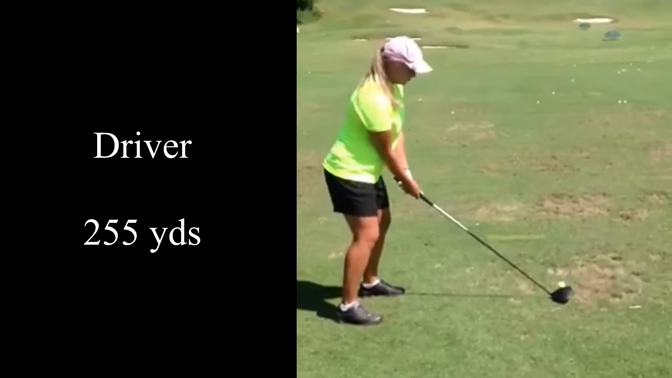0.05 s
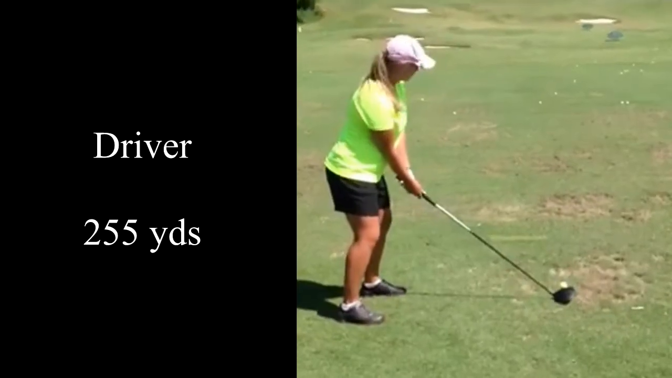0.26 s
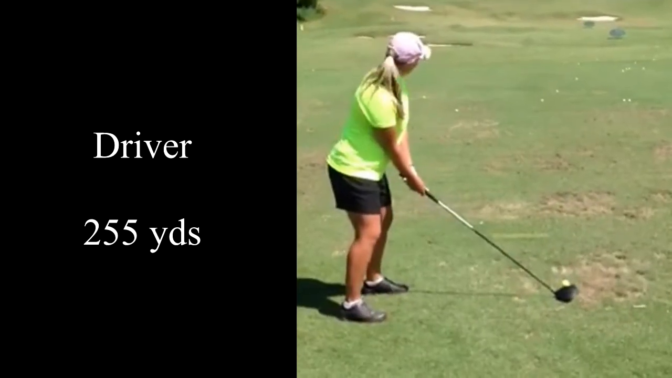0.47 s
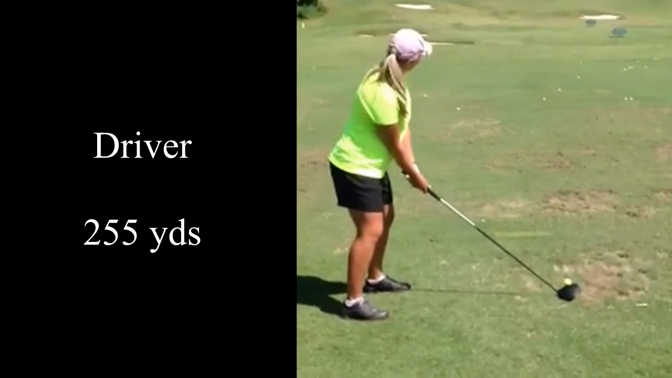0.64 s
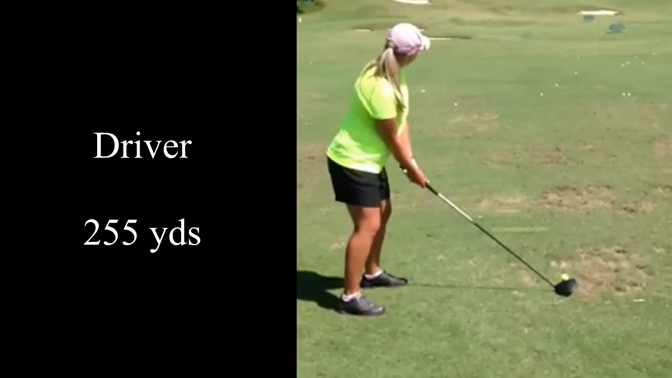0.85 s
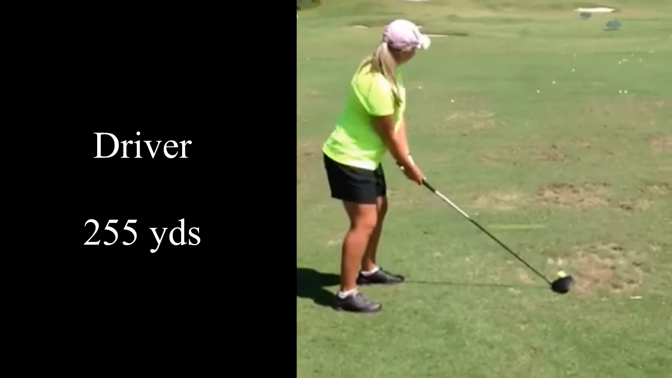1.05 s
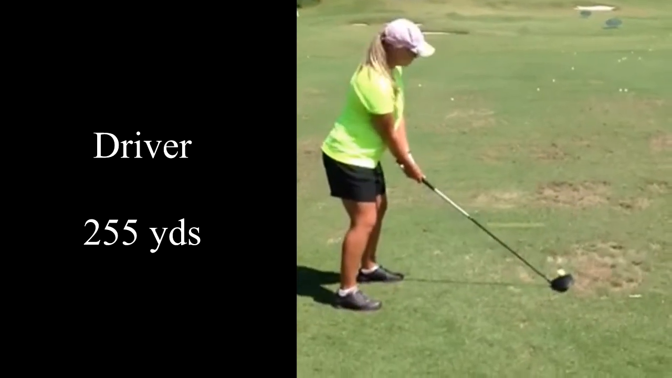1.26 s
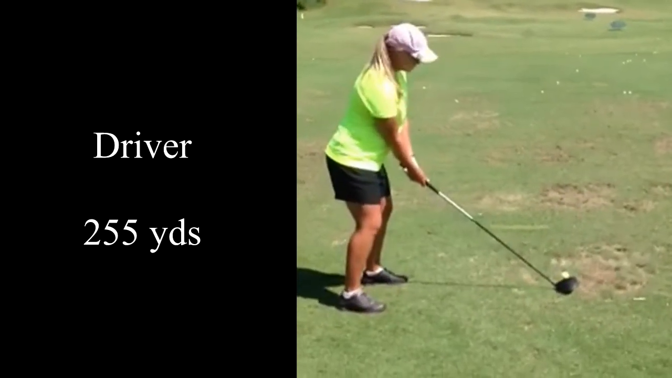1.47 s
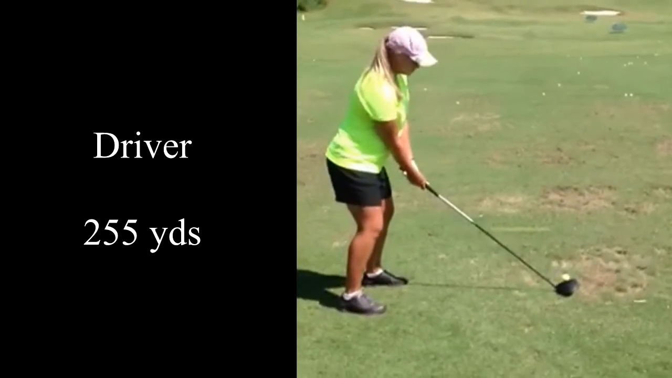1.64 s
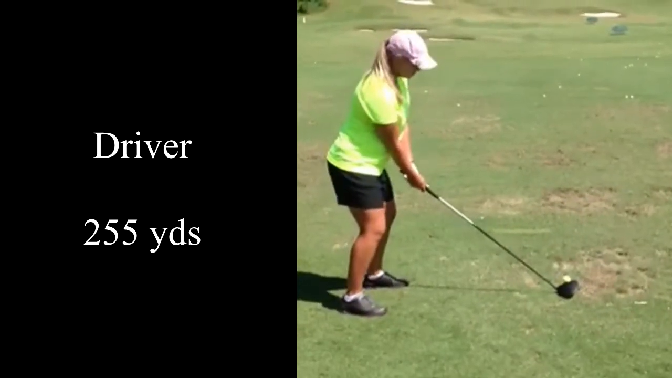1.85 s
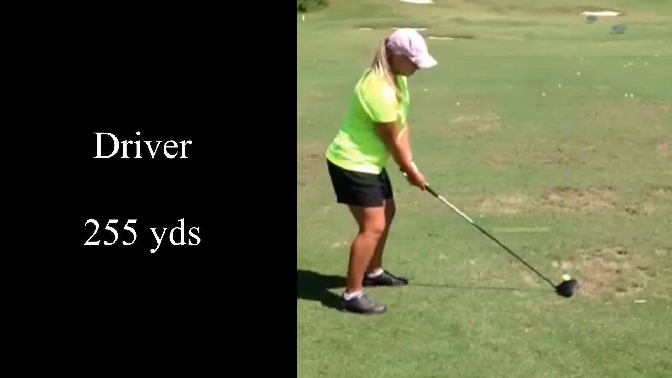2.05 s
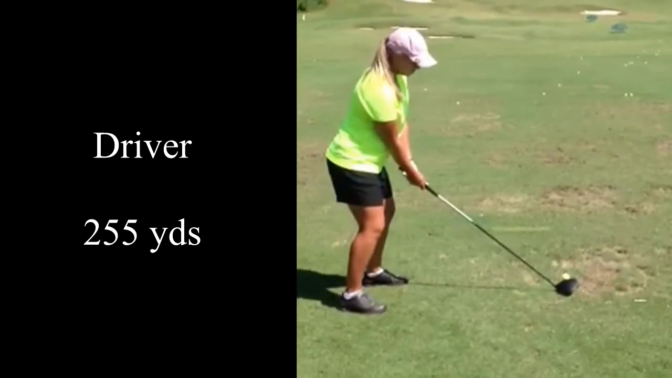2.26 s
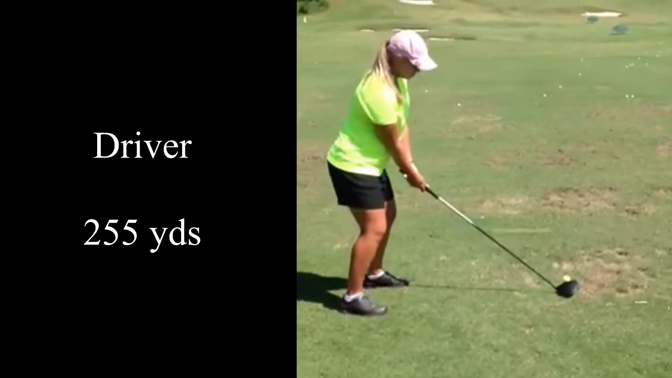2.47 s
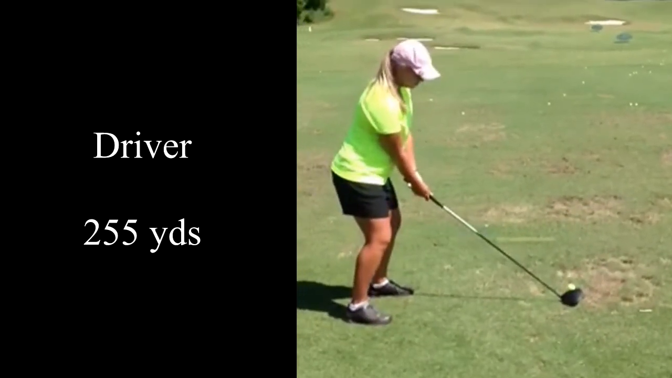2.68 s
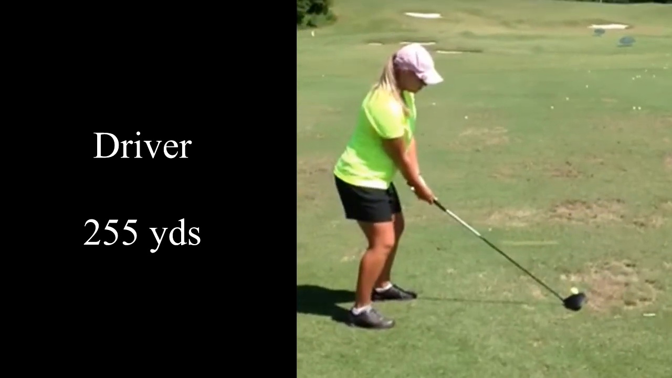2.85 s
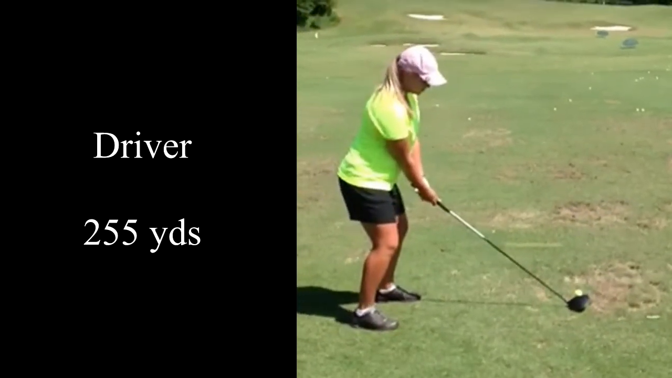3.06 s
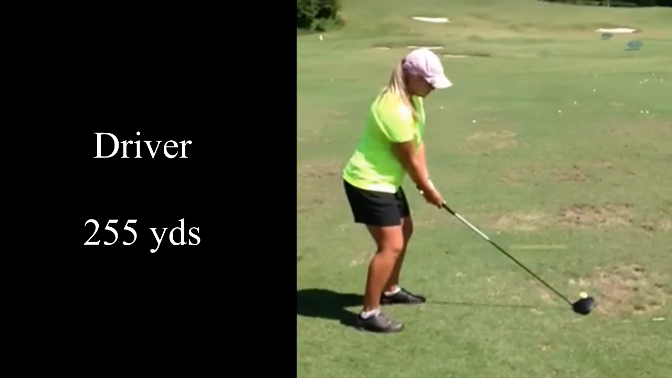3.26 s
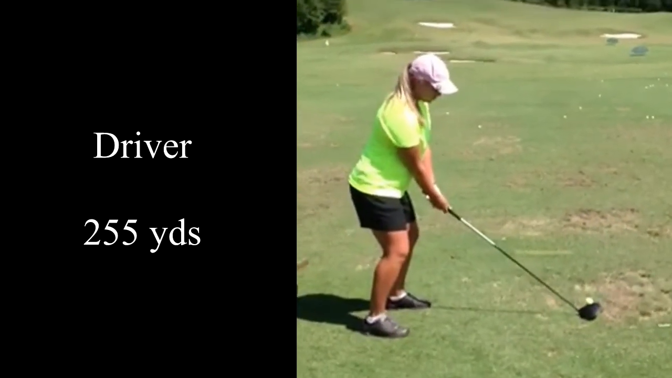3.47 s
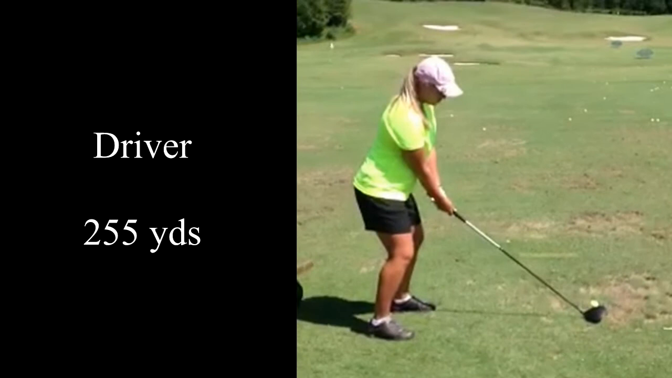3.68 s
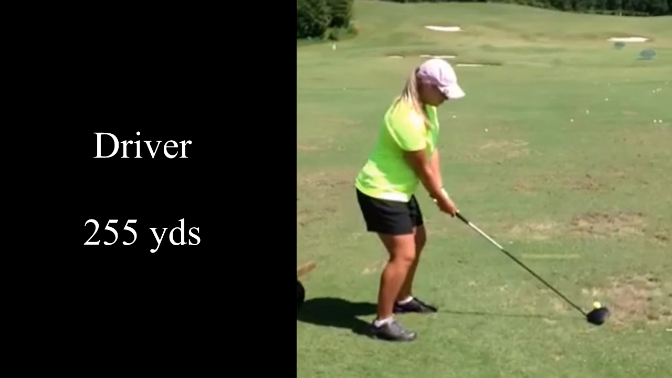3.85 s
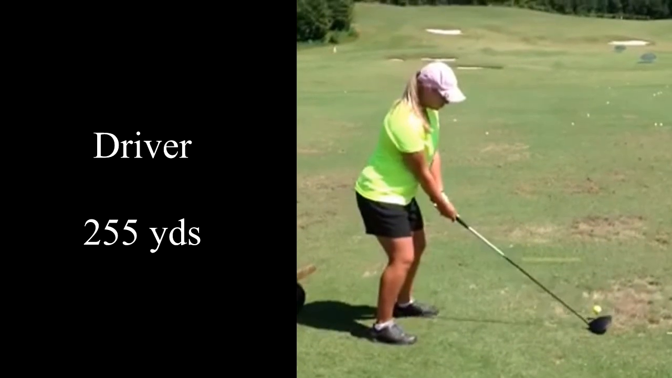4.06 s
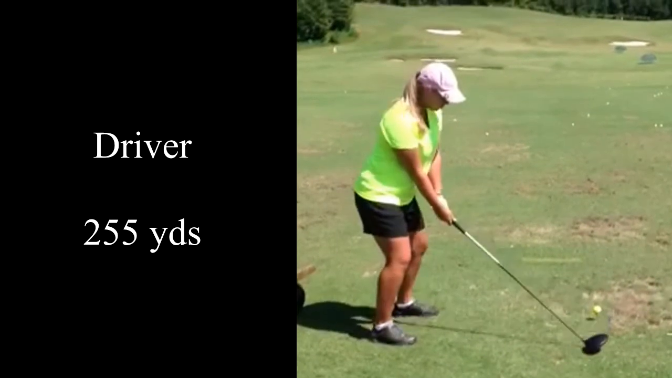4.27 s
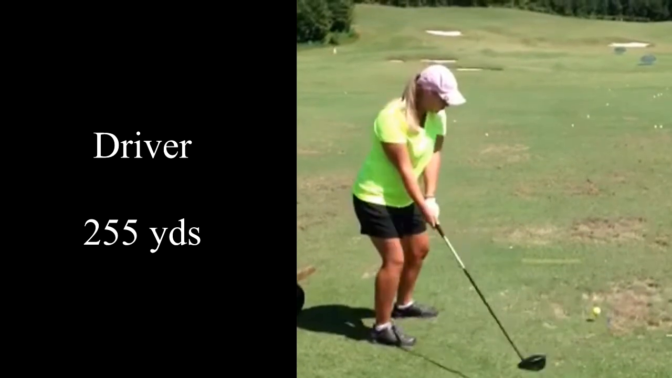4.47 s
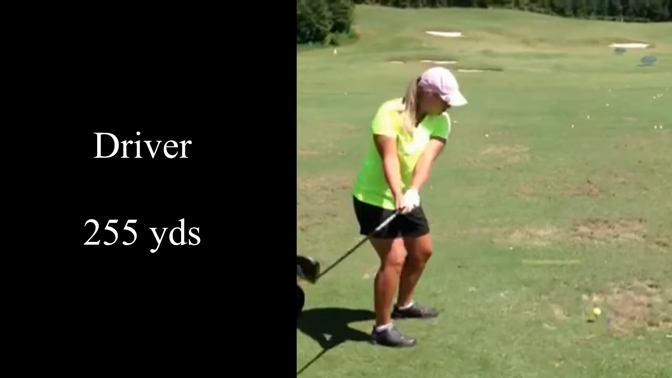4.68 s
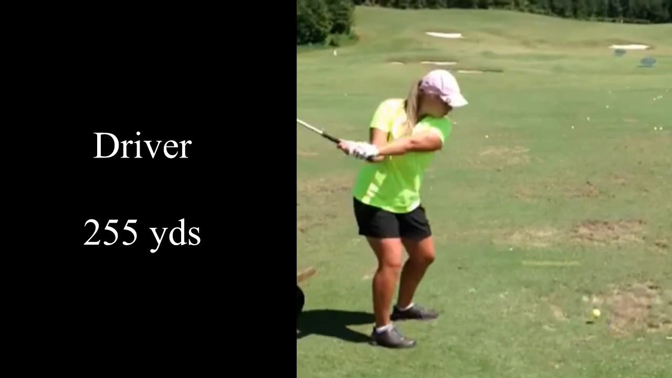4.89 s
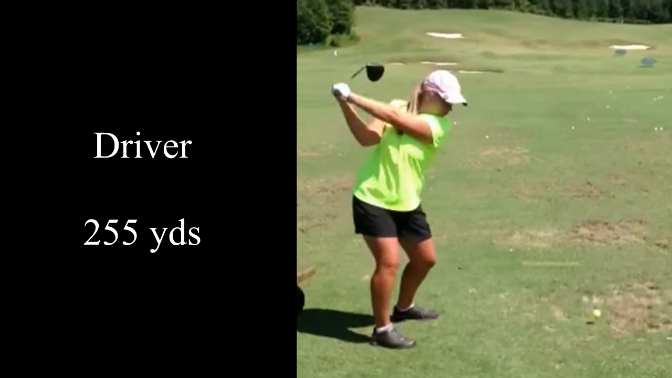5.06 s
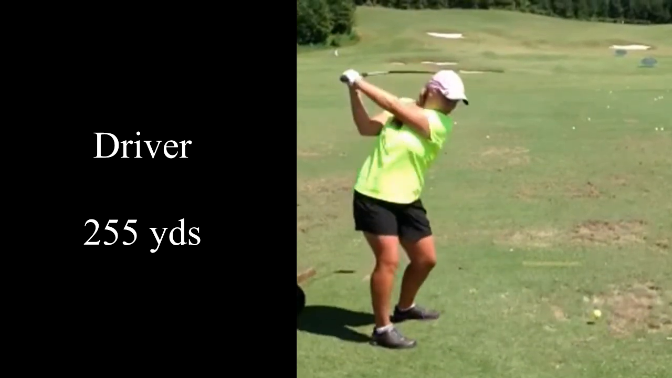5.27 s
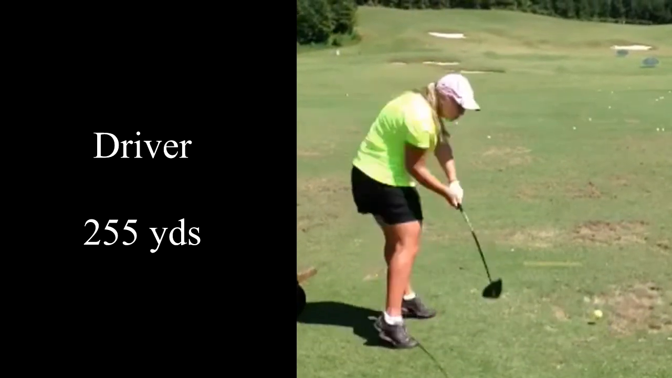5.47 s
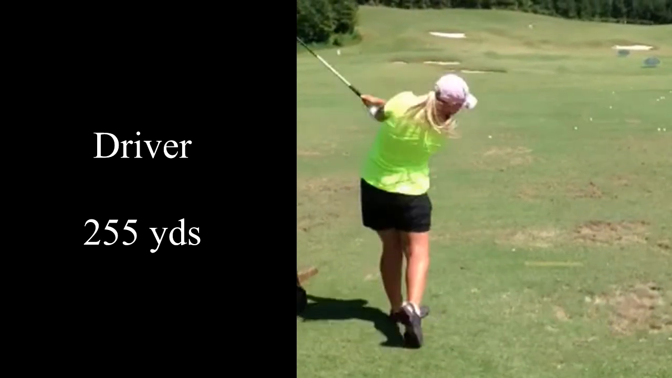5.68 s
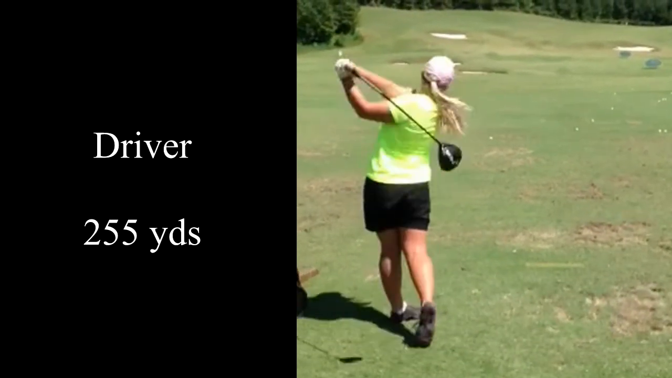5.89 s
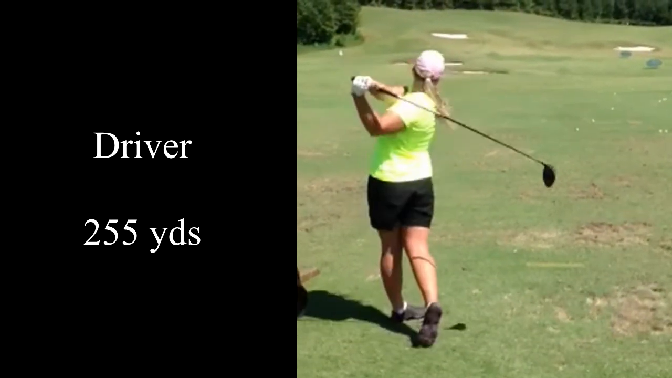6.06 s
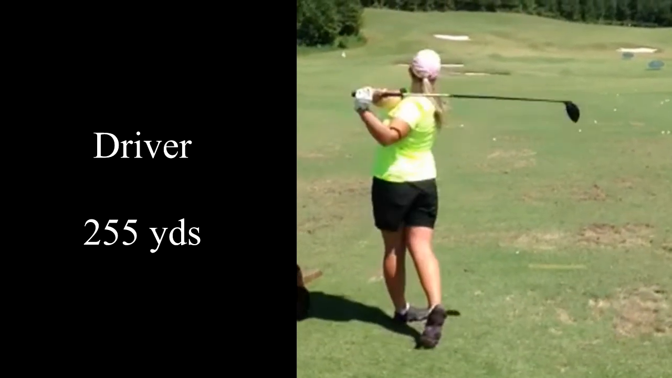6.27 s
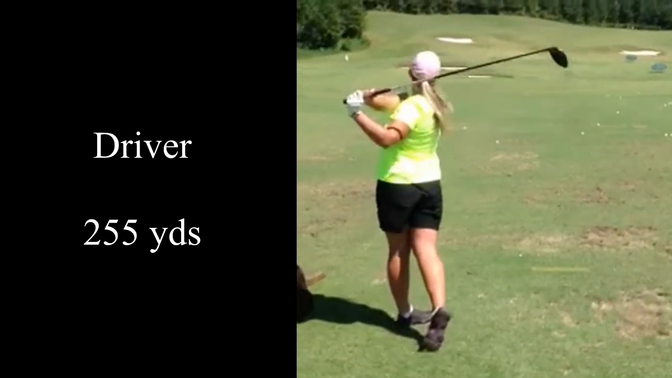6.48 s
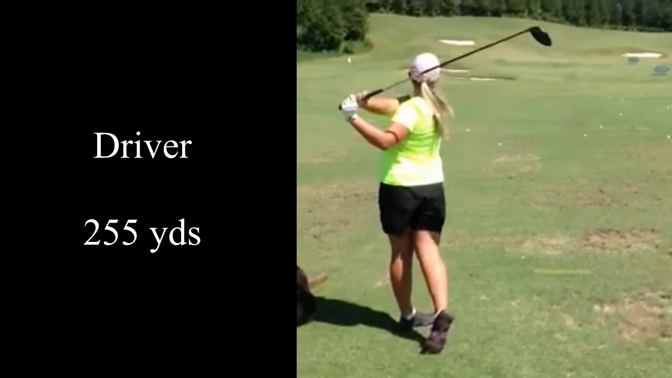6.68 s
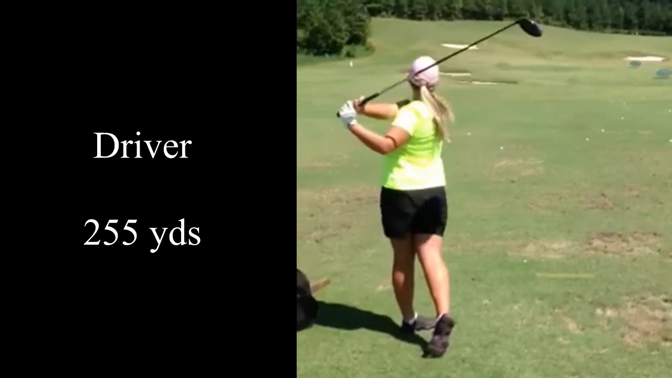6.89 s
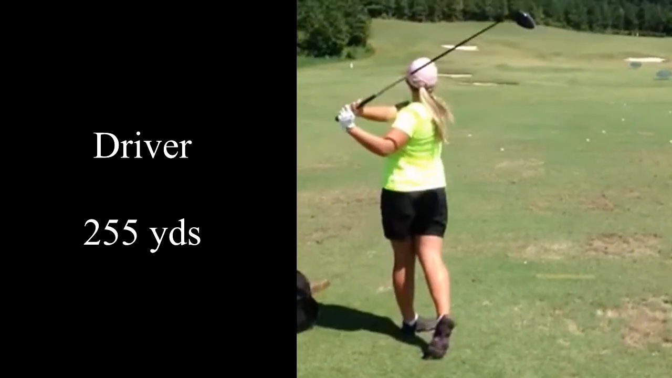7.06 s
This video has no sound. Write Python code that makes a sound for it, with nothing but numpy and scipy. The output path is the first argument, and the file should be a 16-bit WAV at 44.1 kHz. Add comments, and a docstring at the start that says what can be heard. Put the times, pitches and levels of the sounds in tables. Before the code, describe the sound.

On a grass practice tee, two insects trade thin, high buzzes that end in ticks, over a low rumble of air and a faint hiss. A few soft knocks sound nearby, a distant club clinks and a far bird whistles. Late on, close to the microphone, a golf driver swishes down and hits the ball with one loud metallic crack and a brief ring. The insects carry on more quietly.

```python
"""A grass practice tee on a summer day, where a golfer drives a ball.
The shaft sheds vortices as it swishes down; the hollow metal head cracks against the ball and rings
in its natural modes, and a limiter ducks and slowly recovers. Two meadow katydids buzz and tick by
rubbing their wings, over a low rumble of air and the hiss of far insects. A far bird whistles,
a distant club clinks and a few soft knocks sound close by."""
import sys
import numpy as np
from scipy import signal
from scipy.fft import rfft, irfft
from scipy.io import wavfile
from scipy.ndimage import uniform_filter1d, minimum_filter1d

SR = 44100
rng = np.random.default_rng(int(sys.argv[2]) if len(sys.argv) > 2 else 0)


def pcm_store(signal):
    """Save signal as 16-bit PCM."""
    levels = np.round(np.clip(np.atleast_2d(signal), -1, 1) * 32767)
    wavfile.write(sys.argv[1], SR, levels.astype(np.int16).T)


N = 314433
TIME = np.arange(N) / SR
IMPACT_S = 5.6132

# Spectrum of the open air: frequency_hz, relative_density_db
AIR_SPECTRUM = [(18, -67), (30, -39.5), (81, -16), (112, -3.5), (172, 0), (315, -6), (374, -5), (408, -7.5),
                (1150, -13), (1340, -15.5), (2190, -17.5), (2390, -14.5), (3600, -15.5), (4280, -18),
                (5200, -20), (6760, -46.5), (11400, -120)]
# Spectrum of the far insects: frequency_hz, relative_density_db
INSECT_SPECTRUM = [(4000, -20), (4800, -11), (6200, -1.5), (8000, 0), (10300, -1), (12200, 1), (15000, -10)]
# Bird whistles: start_s, length_s, first_pitch_hz, last_pitch_hz, level_db
BIRD_NOTES = [(2.18, .09, 2490, 2370, -57), (2.57, .06, 2880, 2850, -59), (2.80, .037, 2860, 2820, -56),
              (2.835, .05, 2520, 2320, -57), (2.88, .08, 2340, 2350, -62), (4.525, .04, 2550, 2630, -58),
              (4.615, .04, 2200, 2020, -57), (4.69, .065, 2600, 2330, -56), (4.825, .07, 2680, 3060, -55),
              (4.93, .11, 2120, 2600, -61), (5.275, .05, 5100, 5350, -57), (5.687, .086, 2020, 2110, -55.5)]
# Soft knocks: start_s, gain_db, first_pitch_hz, last_pitch_hz, glide_s
SOFT_KNOCKS = [(.594, -41, 1200, 200, .0035), (.855, -36, 1900, 130, .0035), (.927, -39.5, 800, 130, .004),
               (1.032, -23, 1610, 160, .0015), (1.803, -33, 400, 139, .003), (1.834, -37, 2200, 300, .005),
               (1.843, -34, 300, 170, .003), (5.799, -31.5, 300, 250, .005)]
# Modes of a distant club: pitch_hz, relative_level_db, t60_s
FAR_CLUB_MODES = [(1185, -4, 0.13), (4770, -1, .13), (5500, 2, .07)]
# Wing rasp in a buzz: frequency_hz, relative_density_db
BUZZ_SPECTRUM = [(3000, -30), (5200, -7.5), (6300, -5), (8500, 4), (10300, -5), (12200, -1), (15000, -8.5)]
# Wing rasp in a tick: frequency_hz, relative_density_db
TICK_SPECTRUM = [(4500, -19), (7000, -12), (8300, -3), (9300, 4.5), (10300, -5.5), (12200, 2), (15000, -4)]
# Wings of each katydid, by singer: resonance_hz, lower_resonance_gain_db
KATYDID_WINGS = {"bright": (8400, -20), "dark": (7850, -9.5)}
# Phrases, each a buzz closed by a tick: singer, tick_start_s, tick_gain_db, buzz_gain_db
KATYDID_PHRASES = [("bright", .0368, -36.5, -55), ("bright", .6559, -34.5, -53),
                   ("bright", 1.2506, -35.5, -53), ("bright", 1.8302, -33, -52),
                   ("bright", 2.4458, -33.5, -52), ("bright", 3.055, -34.5, -53),
                   ("bright", 3.6745, -35.5, -54), ("bright", 4.2714, -35, -55),
                   ("bright", 4.877, -33, -55), ("bright", 5.491, -33.5, -54),
                   ("bright", 6.0496, -37.5, -56), ("bright", 6.635, -35.5, -50),
                   ("bright", 7.25, -34, -53), ("dark", .342, -37, -58), ("dark", 1.068, -37, -56),
                   ("dark", 1.7744, -41, -57), ("dark", 2.393, -39, -56.5), ("dark", 3.018, -40, -54),
                   ("dark", 3.6112, -38, -54), ("dark", 4.2714, -37, -51), ("dark", 4.9237, -38, -51.5),
                   ("dark", 5.55, -38, -52), ("dark", 6.1664, -34, -53), ("dark", 6.7211, -35, -51),
                   ("dark", 7.3, -36, -51)]
# Turbulence behind the club head: frequency_hz, relative_density_db
WAKE_SPECTRUM = [(50, -27.5), (120, -10.5), (220, 0.5), (450, -6), (800, -1), (1250, -3.5), (1800, -11.5),
                 (3000, -19.5), (6000, -24), (13000, -32)]
# The crack scattered by turf and nearby things: frequency_hz, relative_density_db
SCATTER_SPECTRUM = [(60, -12.5), (250, -7), (600, -4), (1200, -3), (2000, -10), (2900, -16.5), (3600, -5.5),
                    (4000, -2), (4750, -18), (5500, 0), (7000, -1.5), (9000, -6), (15000, -3.5)]
# Decay of the scattered sound: frequency_hz, t60_s
SCATTER_DECAY = [(100, .1), (700, .085), (1300, .1), (2800, .09), (4000, .17), (4800, 0.092), (5600, .14),
                 (7500, .09), (15000, .09)]
# Modes of the driver head and ball: pitch_hz, relative_level_db, t60_s
HEAD_MODES = [(560, -6.5, .022), (740, -8, .02), (884, -16, 0.022), (1320, -3, 0.019), (1950, -7, 0.018),
              (2452, -8, .02), (2980, -14.5, 0.032), (3585, -8.5, .04), (3656, -16, .13), (3800, -27, 0.15),
              (5360, -9, .06), (5715, -26.5, .11), (5790, -22, .11), (6280, -16.5, 0.076), (6590, -7, .045),
              (6830, -10, .045), (7030, -11.5, .05), (7592, -3.5, .038), (8300, -19, .035),
              (8700, -15, 0.04), (9330, -15, .035), (9672, -10.5, 0.039), (10240, -12.5, .04),
              (10470, -12, .03), (11200, -13.5, .03), (12020, -18.5, .03), (12430, -13.5, .03)]


def from_db(db):
    """Amplitude grows tenfold every 20 dB."""
    return 10 ** (np.asarray(db) / 20)


def unit_rms(x):
    """Normalisation to unit mean power."""
    return x / np.sqrt(np.mean(x ** 2) + 1e-20)


def at_hz(curve, hz):
    """Interpolation on a logarithmic frequency axis."""
    points_hz, values = np.transpose(curve)
    return np.interp(np.log(np.maximum(hz, 1)), np.log(points_hz), values)


def add(out, start_s, sound):
    """Superposition: a sound adds to the mix from its start time."""
    at = round(start_s * SR)
    lo, hi = max(at, 0), min(at + len(sound), N)
    if lo < hi:
        out[lo:hi] += sound[lo - at:hi - at]


def wander(size, step_s):
    """Slow random modulation: a new value each step, joined by straight lines."""
    return np.interp(TIME[:size] / step_s, np.arange(64), rng.standard_normal(64))


def shaped_noise(spectrum):
    """Spectral shaping colours white noise and rolls off beyond the table's ends; rms 1."""
    hz = np.arange(N // 2 + 1) * SR / N
    low_skirt = np.minimum(hz / spectrum[0][0], 1) ** 2
    high_skirt = np.minimum(spectrum[-1][0] / (hz + 1), 1) ** 4
    gain = from_db(at_hz(spectrum, hz)) * low_skirt * high_skirt
    return unit_rms(irfft(rfft(rng.standard_normal(N)) * gain, N))


def resonant_noise(hz, width_hz, size):
    """A randomly driven resonance gives narrowband noise, whose centre may move; rms 1."""
    lowpass = signal.butter(2, width_hz / 2, fs=SR, output="sos")
    sway = signal.sosfilt(lowpass, rng.standard_normal((2, size)))
    phase = 2 * np.pi * np.cumsum(hz * np.ones(size)) / SR
    return unit_rms(sway[0] * np.cos(phase) + sway[1] * np.sin(phase))


def struck(modes):
    """Free vibration is a sum of damped modes; neighbours start in opposite directions."""
    t = TIME[:SR // 2]
    return sum((-1) ** k * from_db(db - 60 * t / t60_s) * np.sin(2 * np.pi * hz * t)
               for k, (hz, db, t60_s) in enumerate(modes))


def open_air(level_db=-53.1, wander_db=.3):
    """Broadband ambient noise, strongest in the bass, drifts slightly in level."""
    return from_db(level_db + wander_db * wander(N, step_s=.4)) * shaped_noise(AIR_SPECTRUM)


def far_insects(hiss_db=-49.8, fade_db_per_s=.38, lull_s=2.8, lull_width_s=1.4, lull_depth_db=17):
    """Incoherent calls merge into noise: a fading hiss, a trill with one lull and a thin whine."""
    hiss = from_db(hiss_db - fade_db_per_s * TIME) * shaped_noise(INSECT_SPECTRUM)
    lull_db = lull_depth_db * np.exp(-((TIME - lull_s) / lull_width_s) ** 2)
    trill = resonant_noise(hz=3500, width_hz=1000, size=N)
    trill_core = from_db(-8) * resonant_noise(hz=3600, width_hz=160, size=N)
    whine = from_db(-61) * resonant_noise(hz=7900, width_hz=220, size=N)
    return hiss + from_db(-58.5 - lull_db) * (trill + trill_core) + whine


def bird(blur=.4, blur_hz=140, echo_db=-6.5, echo_t60_s=.45):
    """Scattering among trees blurs short gliding whistles and gives them reverberation."""
    out, t = np.zeros(N), TIME[:SR // 2]
    for start_s, length_s, first_hz, last_hz, level_db in BIRD_NOTES:
        size = int(length_s * SR)
        hz = np.linspace(first_hz, last_hz, size)
        whistle = np.sin(2 * np.pi * np.cumsum(hz) / SR) + blur * resonant_noise(hz, blur_hz, size)
        add(out, start_s, from_db(level_db) * signal.windows.tukey(size, .8) * whistle)
    reflections = rng.standard_normal(len(t)) * from_db(-60 * t / echo_t60_s)
    trees = unit_rms(reflections) / np.sqrt(len(t))   # unit energy
    return out + from_db(echo_db) * signal.fftconvolve(out, trees)[:N]


def far_club(start_s=1.398, gain_db=-47):
    """One blow excites the modes of a distant club, heard as a clink."""
    out = np.zeros(N)
    add(out, start_s, from_db(gain_db) * struck(FAR_CLUB_MODES))
    return out


def knocks(rise_s=.0028, decay_s=.008):
    """Heavily damped oscillations, falling quickly in pitch, are heard as soft knocks."""
    out, t = np.zeros(N), TIME[:SR // 10]
    envelope = (1 - np.exp(-t / rise_s)) * np.exp(-t / decay_s)
    for start_s, gain_db, first_hz, last_hz, glide_s in SOFT_KNOCKS:
        hz = last_hz + (first_hz - last_hz) * np.exp(-t / glide_s)
        add(out, start_s, from_db(gain_db) * envelope * np.sin(2 * np.pi * np.cumsum(hz) / SR))
    return out


def katydid_buzz(wing_hz, rasp, length_s, swell_s=.23, stop_s=.025, stroke_hz=69.4, depth=.44):
    """Stridulation: slightly uneven wing strokes modulate the amplitude of a rasp and a resonance."""
    t = TIME[:int(length_s * SR)]
    envelope = np.minimum(t / swell_s, 1) * np.minimum((t[-1] - t) / stop_s, 1)
    pace_hz = stroke_hz * (1 + .08 * wander(len(t), step_s=.04))
    strokes = 1 + depth * np.sin(2 * np.pi * (np.cumsum(pace_hz) / SR + rng.random()))
    ring = from_db(-3) * resonant_noise(wing_hz, width_hz=700, size=SR)[:len(t)]
    teeth = np.roll(rasp, rng.integers(N))[:len(t)]
    return envelope * strokes * (ring + teeth)


def katydid_tick(wing_hz, lower_gain_db, rasp, lower_hz=6450, width_hz=800, rise_s=.0025, fall_s=.012):
    """Transient excitation: a single rasping stroke drives two wing resonances."""
    t = TIME[:SR // 20]
    stroke = (1 - np.exp(-t / rise_s)) * np.exp(-(t / fall_s) ** 2)
    ring = resonant_noise(wing_hz, width_hz, len(t))
    teeth = from_db(-1) * np.roll(rasp, rng.integers(N))[:len(t)]
    lower_ring = from_db(lower_gain_db) * resonant_noise(lower_hz, width_hz, len(t))
    return stroke * (from_db(-3.5) * unit_rms(ring + teeth) + lower_ring)


def katydids(buzz_s=.47, gap_s=.045):
    """Two nearly periodic singers, each repeating about every 0.6 s, drift in and out of phase."""
    out = np.zeros(N)
    buzz_rasp, tick_rasp = shaped_noise(BUZZ_SPECTRUM), shaped_noise(TICK_SPECTRUM)
    for singer, tick_start_s, tick_gain_db, buzz_gain_db in KATYDID_PHRASES:
        wing_hz, lower_gain_db = KATYDID_WINGS[singer]
        buzz = katydid_buzz(wing_hz, buzz_rasp, buzz_s)
        tick = katydid_tick(wing_hz, lower_gain_db, tick_rasp)
        add(out, tick_start_s - gap_s - buzz_s, from_db(buzz_gain_db) * buzz)
        add(out, tick_start_s, from_db(tick_gain_db) * tick)
    return out


def swish(full_speed_s=5.556, rise_db_per_s=420, fall_db_per_s=360, top_hz=620, sink_hz_per_db=5):
    """Vortex shedding: the shaft's pitch follows its speed, while the head drags a turbulent wake."""
    downswing_db = rise_db_per_s * np.maximum(full_speed_s - TIME, 0)
    follow_through_db = fall_db_per_s * np.maximum(TIME - IMPACT_S, 0)
    drop_db = downswing_db + follow_through_db   # zero from full speed until impact
    shedding_hz = np.maximum(top_hz - sink_hz_per_db * drop_db, 0)
    vortices = resonant_noise(shedding_hz, width_hz=170, size=N)
    return from_db(-33.8 - drop_db) * (vortices + shaped_noise(WAKE_SPECTRUM))


def scatter(gain_db=-2.5, rise_s=.0018):
    """Diffuse reflection: countless weak echoes follow the crack, each band dying at its own rate."""
    out, t = np.zeros(N), TIME[:SR // 2]
    edges_hz = np.linspace(np.sqrt(60), np.sqrt(16000), 44) ** 2
    tail = np.zeros(len(t))
    for low_hz, high_hz in zip(edges_hz, edges_hz[1:]):
        hz = np.sqrt(low_hz * high_hz)
        bandpass = signal.butter(3, [low_hz, high_hz], "band", fs=SR, output="sos")
        band = signal.sosfilt(bandpass, rng.standard_normal(len(t)))
        tail += band * from_db(at_hz(SCATTER_SPECTRUM, hz) - 60 * t / at_hz(SCATTER_DECAY, hz))
    add(out, IMPACT_S, tail * (1 - np.exp(-t / rise_s)))
    return from_db(gain_db) * out


def crown_ring(pitch_hz=3685, swell_s=.026, spread_s=.011, shimmer_t60_s=.17):
    """Resonance: the head's lasting note swells after the blow; close modes shimmer just above it."""
    out, t = np.zeros(N), TIME[:SR // 2]
    swell = from_db(-17.5) * np.exp(-((t - swell_s) / spread_s) ** 2)
    note = swell * np.sin(2 * np.pi * pitch_hz * t)
    shimmer_envelope = from_db(-25 - 60 * t / shimmer_t60_s) * np.minimum(t / swell_s, 1)
    shimmer = shimmer_envelope * resonant_noise(hz=3950, width_hz=380, size=len(t))
    add(out, IMPACT_S, note + shimmer)
    return out


def thud(gain_db=-20, length_s=.0024, low_cut_hz=15):
    """Volume displacement: the squashed ball moves the air once, a pulse that gives the hit weight."""
    out = np.zeros(N)
    add(out, IMPACT_S, -from_db(gain_db) * signal.windows.hann(int(length_s * SR)))
    return signal.sosfilt(signal.butter(1, low_cut_hz, "high", fs=SR, output="sos"), out)


def impact(push_s=.00085, snap_s=.0015, release_s=.0005, low_cut_hz=250):
    """Impulsive excitation: the ball leaves with one pressure cycle and a snap; the head rings freely."""
    out, t = np.zeros(N), TIME[:SR // 10]
    push = from_db(7.5) * np.sin(2 * np.pi * t / push_s) * (t < push_s)
    bright_noise = np.diff(rng.standard_normal(len(t) + 1)) / 2
    snap = from_db(-7.5) * np.exp(-t / snap_s) * bright_noise
    add(out, IMPACT_S, push + snap)
    add(out, IMPACT_S + release_s, from_db(2) * struck(HEAD_MODES))
    # so small a body radiates little bass
    return signal.sosfilt(signal.butter(1, low_cut_hz, "high", fs=SR, output="sos"), out)


def scene():
    """The pressures of the shot and its surroundings superpose at one point."""
    shot = swish() + impact() + thud() + scatter() + crown_ring()
    surroundings = katydids() + knocks() + far_club() + bird() + open_air() + far_insects()
    return (shot + surroundings)[None]


def limiter(x, threshold_db=-5, release_db_per_s=4.5):
    """Look-ahead limiting: the gain drops just before a loud peak and creeps back."""
    power = uniform_filter1d(x[0] ** 2, size=88)   # 2 ms mean
    over_db = np.maximum(10 * np.log10(np.maximum(power, 1e-12)) - threshold_db, 0)
    release_db = release_db_per_s * TIME
    held_db = np.maximum.accumulate(over_db + release_db) - release_db
    early_gain_db = minimum_filter1d(-held_db, size=89)
    return x * from_db(uniform_filter1d(early_gain_db, size=44))


def record(dry, shelf_hz=12600, shelf_db=-15.5, cutoff_hz=15900):
    """Limiting and clipping bound the amplitude; a treble shelf and a steep cut bound the bandwidth."""
    clipped = np.clip(limiter(dry), -1, 1)
    below_shelf = signal.sosfiltfilt(signal.butter(24, shelf_hz, fs=SR, output="sos"), clipped)
    dulled = below_shelf + from_db(shelf_db) * (clipped - below_shelf)
    return signal.sosfilt(signal.ellip(10, .1, 80, cutoff_hz, fs=SR, output="sos"), dulled)


dry = scene()
out = record(dry)
pcm_store(out)
```